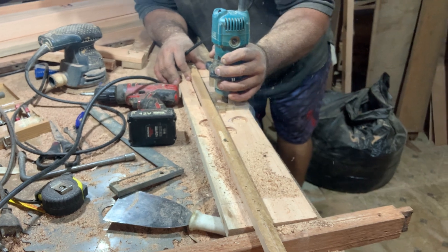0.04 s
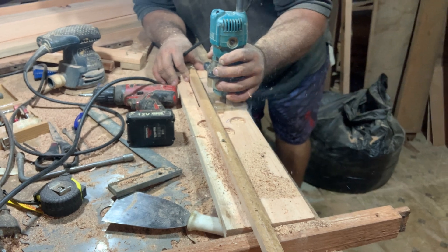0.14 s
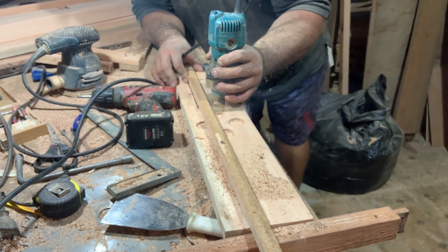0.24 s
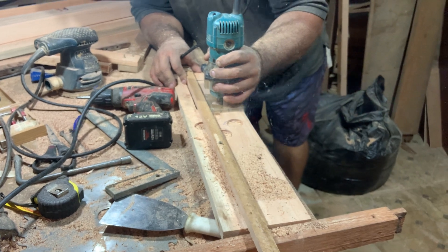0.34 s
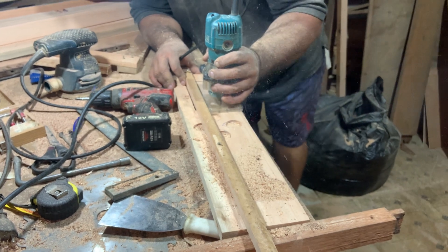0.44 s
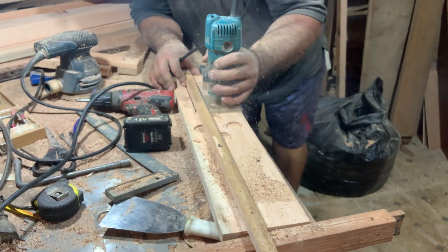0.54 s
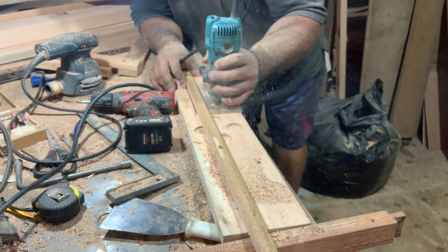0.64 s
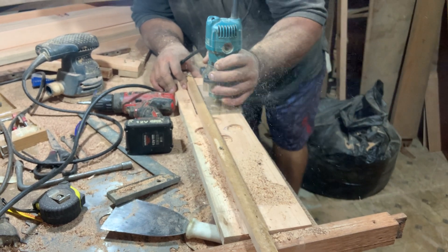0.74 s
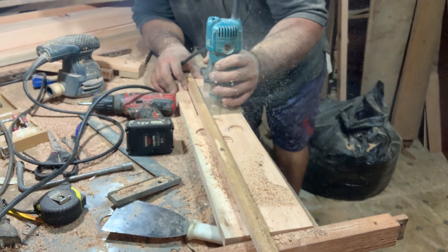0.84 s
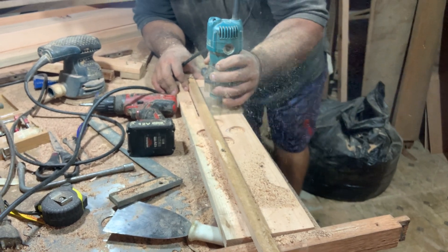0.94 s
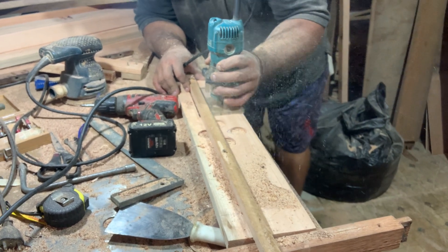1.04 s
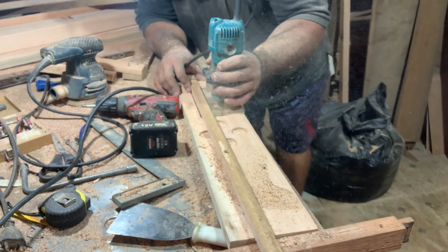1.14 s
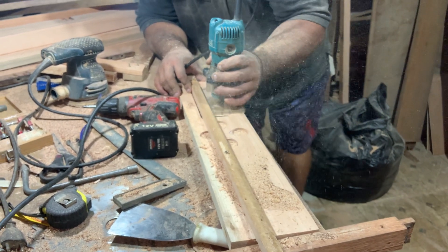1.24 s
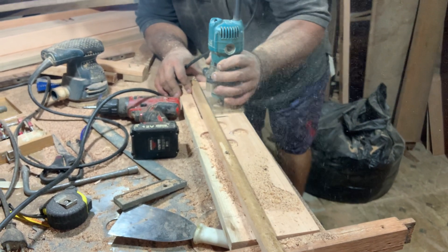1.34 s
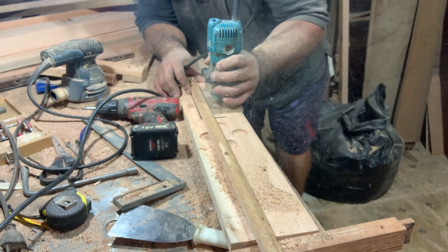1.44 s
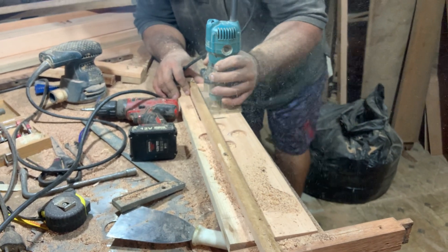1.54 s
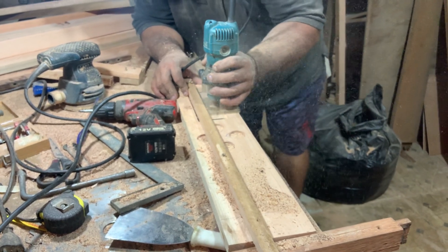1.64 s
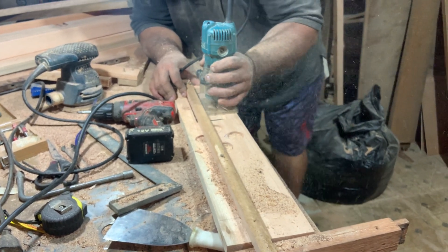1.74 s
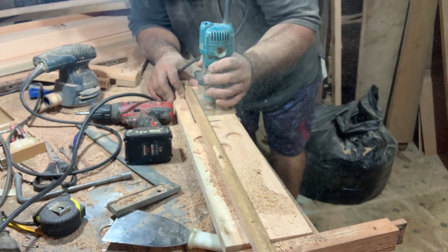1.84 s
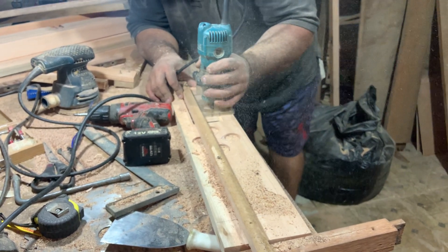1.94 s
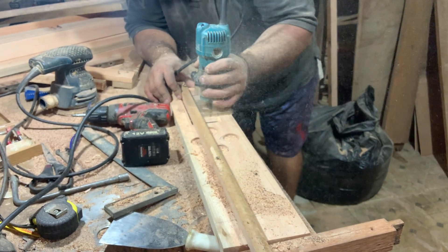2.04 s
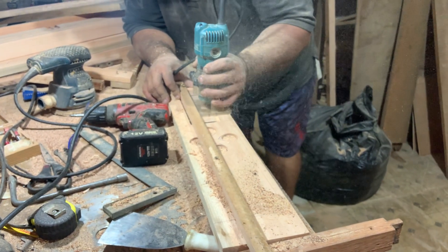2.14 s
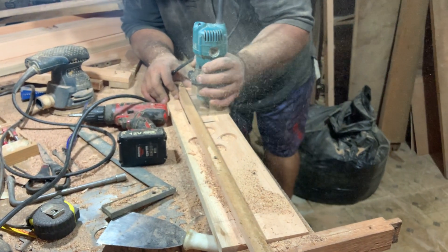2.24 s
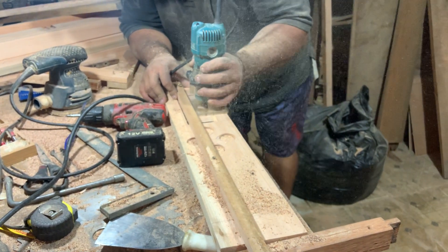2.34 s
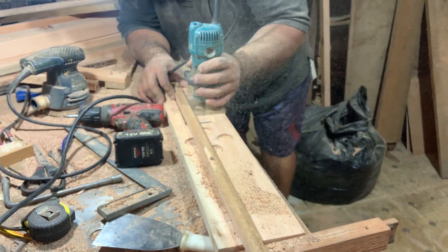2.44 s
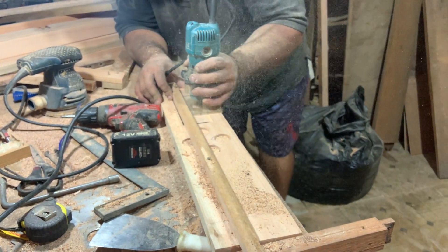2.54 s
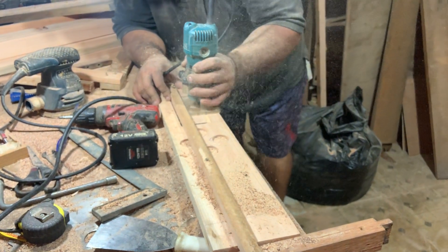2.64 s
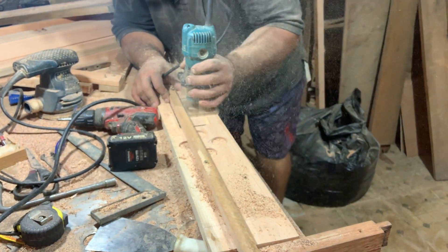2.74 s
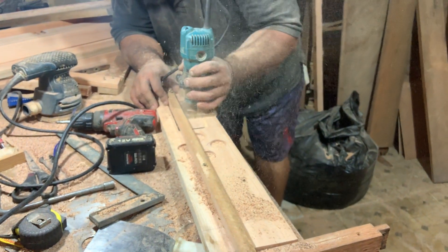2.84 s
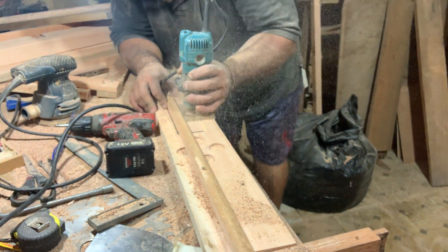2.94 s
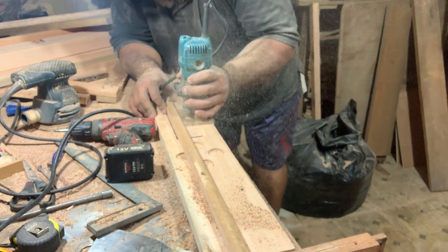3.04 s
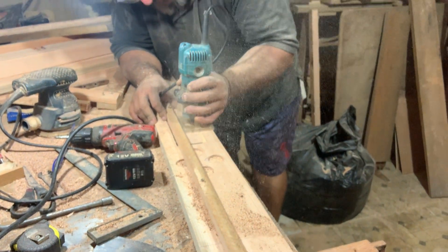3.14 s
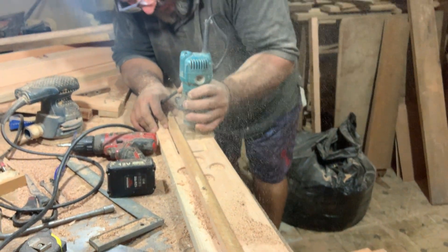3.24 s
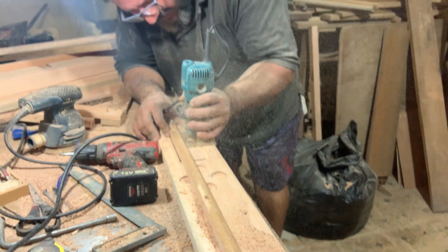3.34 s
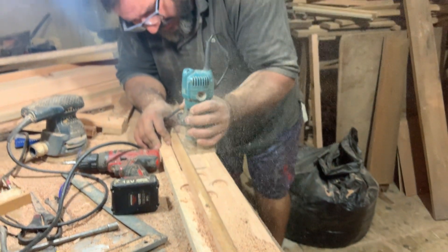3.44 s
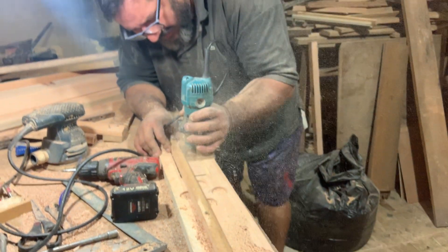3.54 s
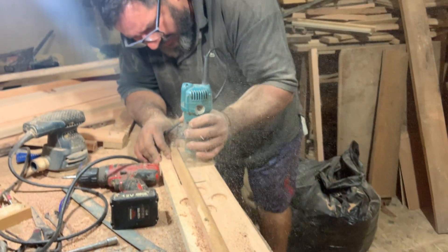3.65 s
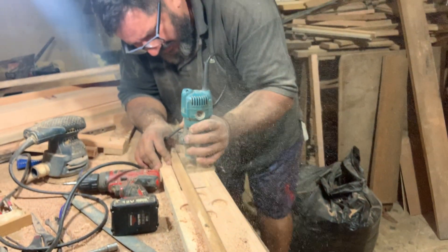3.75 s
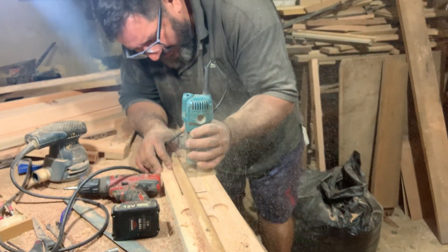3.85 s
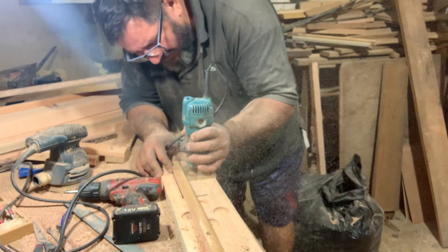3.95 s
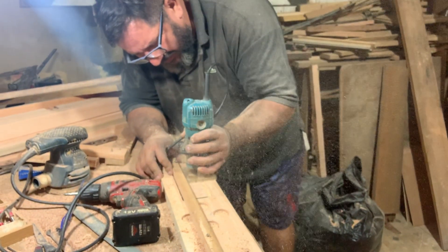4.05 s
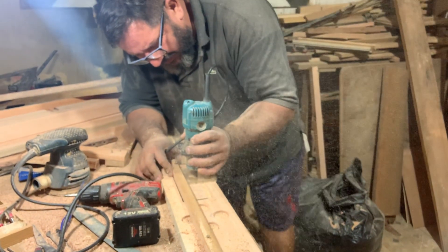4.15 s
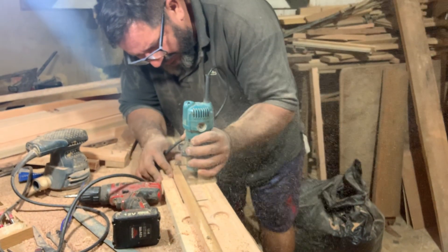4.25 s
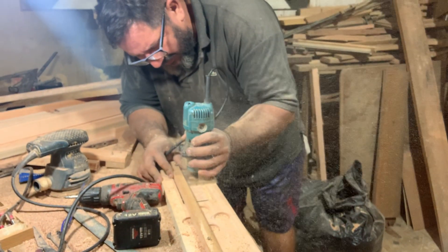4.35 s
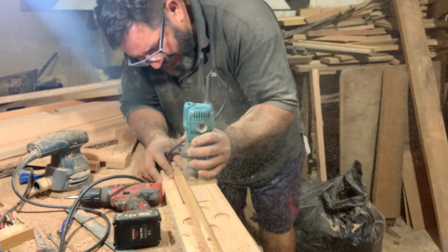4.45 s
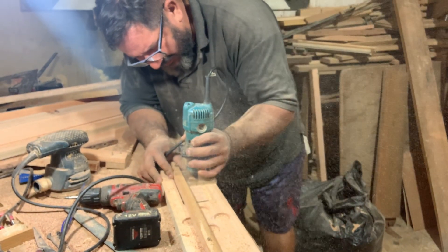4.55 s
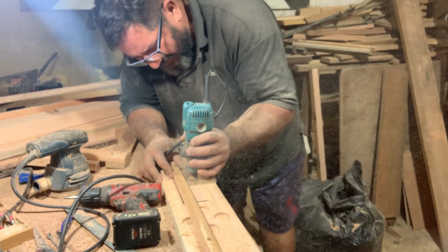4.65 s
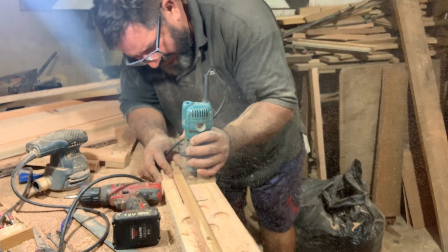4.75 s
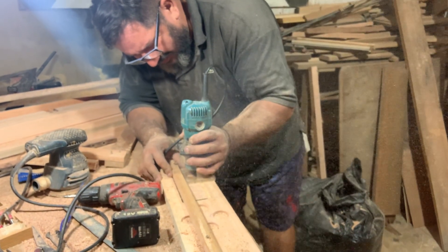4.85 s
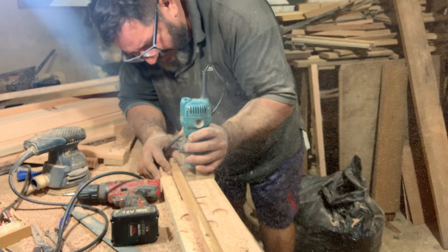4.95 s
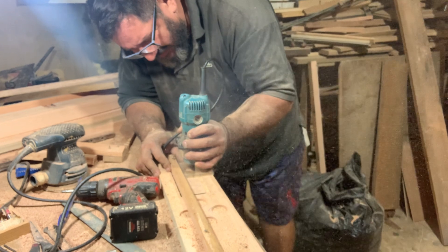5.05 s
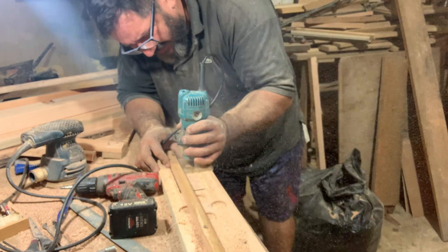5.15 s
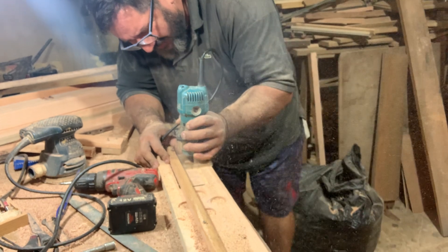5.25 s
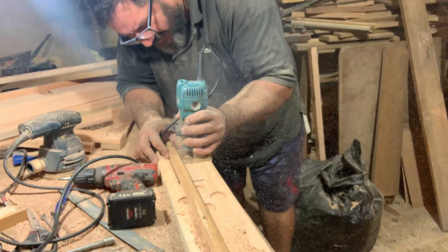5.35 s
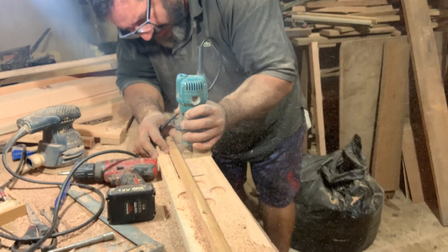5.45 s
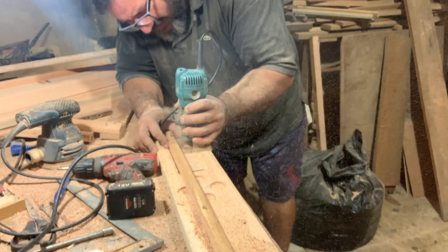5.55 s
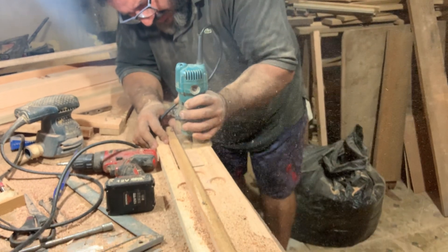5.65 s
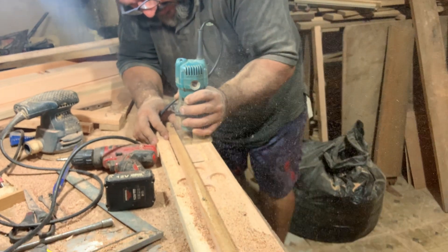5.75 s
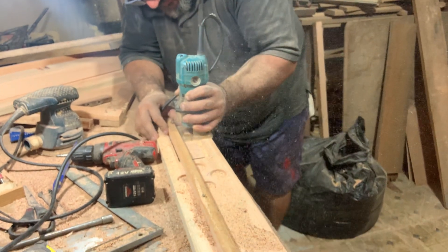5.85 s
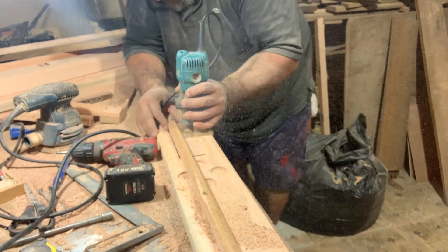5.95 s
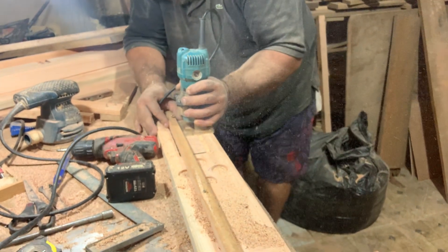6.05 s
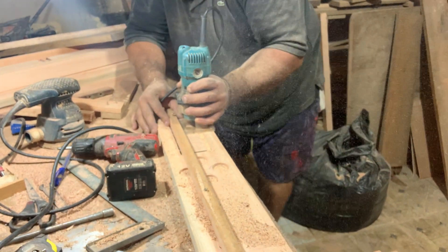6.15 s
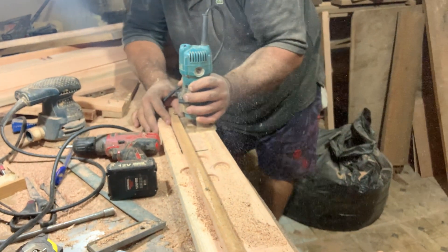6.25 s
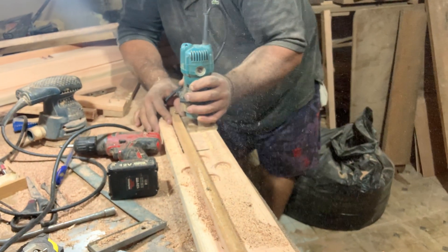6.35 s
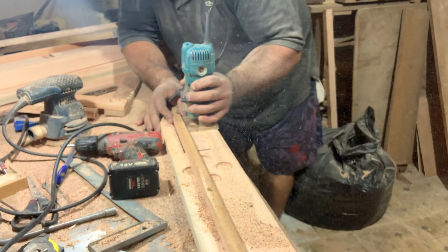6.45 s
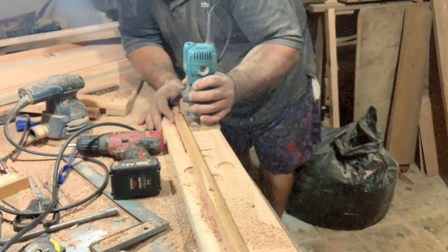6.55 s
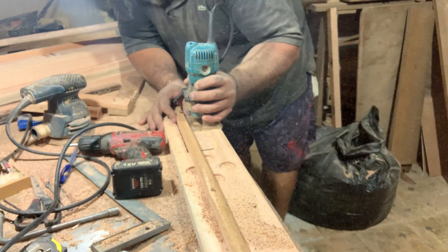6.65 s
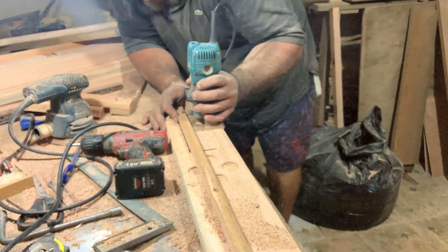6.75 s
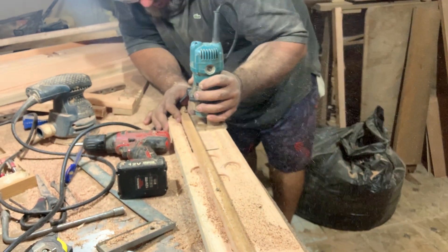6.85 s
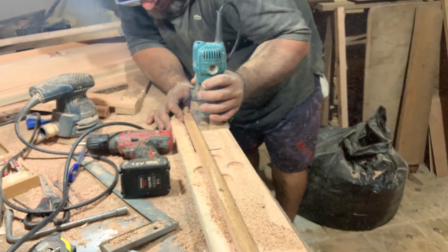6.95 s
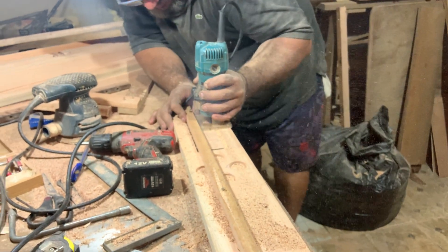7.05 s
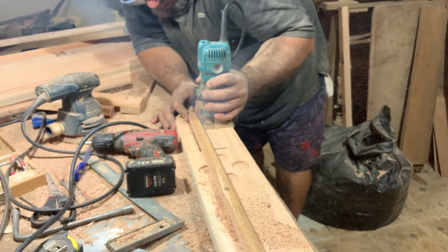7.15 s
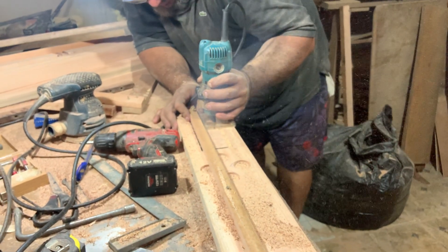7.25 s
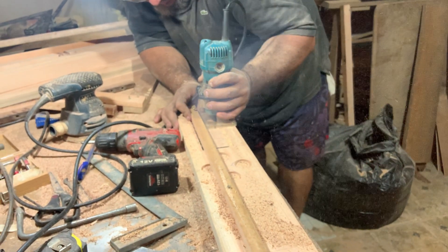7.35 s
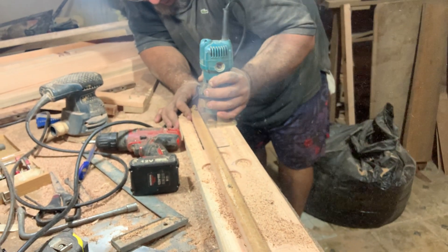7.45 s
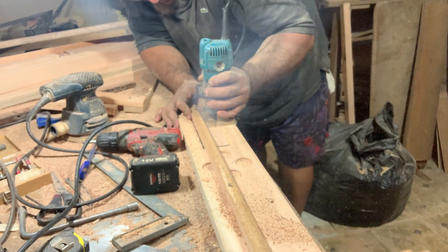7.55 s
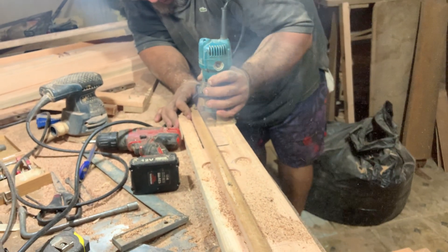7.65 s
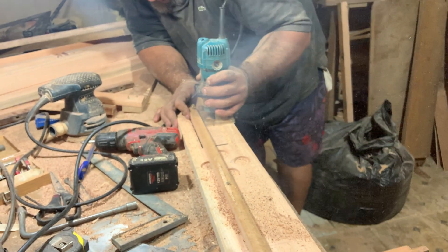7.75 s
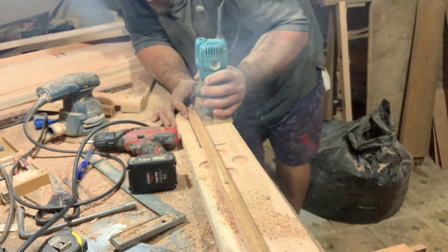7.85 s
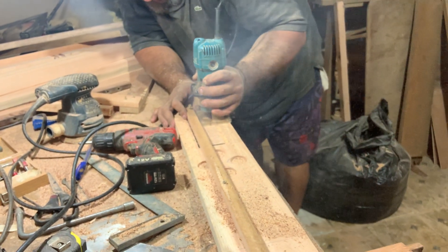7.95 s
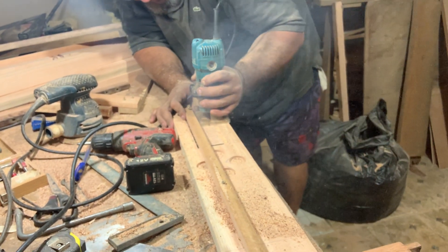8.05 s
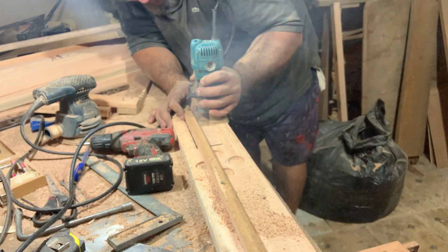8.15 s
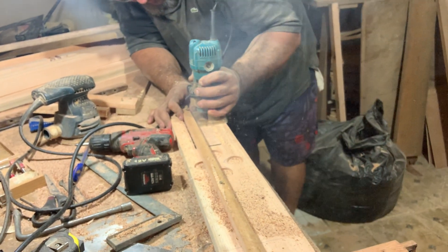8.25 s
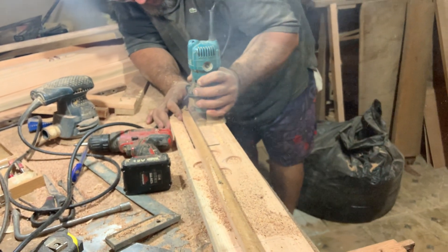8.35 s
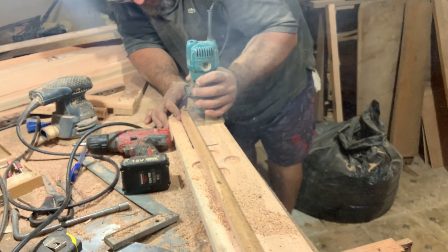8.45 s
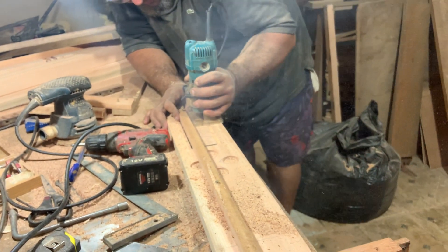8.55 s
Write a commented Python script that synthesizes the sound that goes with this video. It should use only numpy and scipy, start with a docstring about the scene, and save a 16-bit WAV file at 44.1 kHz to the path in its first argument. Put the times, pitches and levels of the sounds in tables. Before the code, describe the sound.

A handheld router whines loudly as it cuts along a board, its pitch sagging under load, climbing high mid-way, then sinking again amid hissing chips.

```python
"""A handheld router works along a board in a timber workshop; its speed sags under load and recovers.
Shaft and two-flute bit sound as sines at multiples of the turning rate, with side tones from the mains
ripple of the motor. Board noise and the hiss of chips and cooling air are noise pulsed by the flutes;
the steel bit rings through resonances, at its strongest a squeal, and a faint mains hum lies beneath.
Two microphone ports hear it in a small dry room whose walls are feedback delays."""
import sys
import numpy as np
from scipy import signal
from scipy.fft import rfft, irfft, next_fast_len
from scipy.io import wavfile
from scipy.ndimage import uniform_filter1d

SR = 44100
rng = np.random.default_rng(int(sys.argv[2]) if len(sys.argv) > 2 else 0)


def digitize_waveform(pressure):
    """Quantize a signal to 16-bit integers and store it at the path in sys.argv[1].

    Rows of a 2-D input are taken as channels; values are limited to [-1, 1].
    """
    field = np.atleast_2d(pressure).T
    bounded = np.clip(field, -1, 1)
    quanta = np.round(bounded * 32767).astype(np.int16)
    wavfile.write(sys.argv[1], SR, quanta)


N = 378819  # samples

# Room and ports
# sound returned by the walls: (frequency [Hz], level [dB])
WALL_SPECTRUM = [(40, -27), (100, -26), (250, -23), (500, -11.5), (1200, -14.5), (2500, -13.5), (5500, -13),
                 (6500, -10), (8500, -24), (15000, -21)]
# phase by which the left port leads in the direct sound: (frequency [Hz], lead [rad])
PORT_PHASE = [(0, 0), (1000, .55), (2000, .95), (3400, 1.8), (4300, 1.5), (4900, 2.1), (5500, 1.8),
              (6300, 0), (8600, -3.14), (10400, -5.6), (11000, -6.3), (13450, -9.42), (15300, -12.5)]
# direct sound, left minus right: (frequency [Hz], level [dB])
PORT_BALANCE = [(60, -0.5), (500, -3.5), (1500, -2), (2100, 0.5), (2800, -4.5), (4300, -5), (5400, -14),
                (6300, -6), (7200, 0), (8500, -4.5)]
# the tool drifts across, left minus right: (time [s], level [dB])
TOOL_TRAVEL = [(0.0, 4), (0.26, 2), (0.5, 2.5), (1.91, 1.5), (2.56, 3), (3.8, 2), (3.99, 3), (4.28, 2.5),
               (4.55, 3.5), (5.05, 0.5), (6.51, 3.5), (6.77, 4), (7.25, 2.5), (7.58, 2.5), (7.92, 2),
               (8.59, 4)]
ROOM_T60_S, CUTOFF_HZ = 0.31, 15600

# Mains hum and torque ripple
RIPPLE_HZ = 120
# hum lines before they waver: (frequency [Hz], rms level [dB])
HUM_LINES = [(120, -67), (240, -59)]
# wavering of the hum: (time [s], change [dB])
HUM_CHANGE = [(0, -9), (1.5, -4), (2, -8), (3.1, 2), (4.1, -5), (4.7, -4), (5.9, 0), (6.4, -10), (7.4, -6),
              (7.8, -2.5), (8.59, -7)]

# Speed and cut
# spindle speed before inertia rounds it off: (time [s], turning rate [Hz])
SPINDLE_SPEED = [(0.0, 391.6), (0.04, 381.8), (0.57, 315.4), (0.74, 303.3), (0.88, 302.3), (1.17, 305),
                 (1.38, 292.9), (1.43, 293.7), (1.55, 305.8), (1.63, 312.9), (1.82, 317.4), (2.01, 335.5),
                 (2.32, 339.7), (2.46, 335.2), (2.56, 322.9), (2.87, 304.4), (3.18, 316.4), (3.37, 308.6),
                 (3.49, 293.1), (3.54, 291.9), (3.76, 322), (3.85, 333.8), (3.97, 337.2), (4.16, 331.5),
                 (4.35, 362.7), (4.47, 366.7), (4.81, 357.6), (4.98, 350.3), (5.17, 344.6), (5.65, 342.2),
                 (6.0, 392.4), (6.17, 415.4), (6.44, 439), (6.6, 452.5), (6.84, 463.3), (6.94, 457.4),
                 (7.61, 401.4), (7.85, 378.5), (7.99, 368.8), (8.08, 366.5), (8.47, 361), (8.59, 358.7)]
INERTIA_S = .04  # the rotor rounds off each change of speed
# base levels: (time [s], bite of two flutes [dB], once-a-turn shake [dB], chip hiss [dB])
CUT_LEVELS = [(0.0, -30.5, -34.5, -30), (0.08, -29, -36, -35), (0.24, -27, -46.5, -32.5),
              (0.48, -35.5, -43.5, -42), (0.64, -36, -45.5, -33.5), (0.74, -34.5, -40.5, -38),
              (1.28, -31.5, -38, -34.5), (1.5, -37.5, -40.5, -37.5), (1.76, -35, -43, -39.5),
              (1.89, -35, -48, -41), (2.16, -30.5, -44, -39.5), (2.4, -30, -43, -38.5),
              (2.48, -27, -40.5, -33.5), (2.56, -33.5, -40.5, -35), (2.72, -26, -42.5, -34.5),
              (2.82, -32, -40, -36.5), (2.96, -24.5, -42.5, -36), (3.2, -26, -40, -35),
              (3.52, -26.5, -35.5, -35.5), (3.66, -37, -49, -36.5), (3.8, -36.5, -49, -42.5),
              (4.0, -26.5, -35.5, -40), (4.2, -33, -42.5, -39), (4.5, -32, -44.5, -41.5),
              (4.88, -29, -46, -38.5), (5.3, -34.5, -44.5, -40), (5.66, -32, -46.5, -39.5),
              (5.8, -36, -40, -43), (6.16, -45.5, -46, -40.5), (6.7, -41, -43, -34),
              (6.96, -33.5, -41, -32.5), (7.36, -28.5, -40, -37), (7.44, -29.5, -41, -36),
              (7.9, -29, -45.5, -42), (8.4, -33.5, -48.5, -39.5), (8.59, -29.5, -46.5, -39)]
# reference from which layers follow the cut: (bite [dB], shake [dB], chips [dB])
REFERENCE_CUT = [-31, -42, -38]
# layers that follow the cut: (mean level [dB], shares of the swing of bite, shake, chips [dB/dB])
BOARD_FOLLOW, RING_FOLLOW = (-44, 0.2, 0.4, -0.18), (-39, -0.02, 0.5, 0.5)

# Noise and ring
# relative spectrum of the chip hiss: (frequency [Hz], density [dB per Hz])
CHIP_SPECTRUM = [(1500, -9.5), (2500, 8), (3200, 6.5), (4200, 6.5), (5600, 3), (6500, 9), (7500, 8.5),
                 (8300, -3.5), (9500, 11), (12000, -53)]
# chip hiss above AIRY_HZ: (time [s], change [dB])
CHIP_BRIGHTNESS = [(0, -3), (1, -10), (2, -2.5), (2.6, -7), (3.2, -12), (3.8, -2.5), (4.2, 0.5), (5, -2),
                   (5.7, -1.5), (6.2, -5), (6.8, -8.5), (7.3, 1), (7.9, 2), (8.59, -2)]
AIRY_HZ = 3600
# relative spectrum of the board noise: (frequency [Hz], density [dB per Hz])
BOARD_SPECTRUM = [(25, -33), (45, -17), (60, -8.5), (115, -11), (180, -23), (250, -16), (340, -5.5),
                  (530, -14), (640, -11), (760, -13), (950, 3.5), (1200, -0.5), (1600, 2), (2100, 2.5),
                  (3200, -15), (4200, -10), (7000, -80)]
# ends of the board noise: (time [s], rumble under RUMBLE_HZ [dB], rasp above RASP_HZ [dB])
RUMBLE_AND_RASP = [(0, -6, -1), (.9, -13, 2), (1.35, -3, 3), (1.7, -1, 0), (2.3, 0, 0), (2.7, 4, 3.5),
                   (3.5, 1, 6.5), (4, 3, -4), (4.5, -4, -4), (5.3, 6, -11), (5.7, 0, -1), (6.3, 1, 4.5),
                   (6.9, 1, -6.5), (7.5, -2, -3), (8, 5, 1), (8.59, 3, -4)]
# board noise between RUMBLE_HZ and DRONE_HZ: (time [s], change [dB])
DRONE_LEVEL = [(0, 1), (.8, -6), (1.6, -8), (2.2, 4), (2.7, -6), (3.5, 0), (4.1, -9), (4.6, -2.5), (5.3, 1),
               (5.8, 2), (6.4, 10), (6.9, -8), (7.5, 3), (8, -6), (8.59, -3)]
RUMBLE_HZ, DRONE_HZ, RASP_HZ = 170, 750, 1250
# board noise swells or sinks: (time [s], length [s], change [dB])
BOARD_CHANGES = [(.0, 0.25, -1), (.85, 0.26, -2), (1.25, 0.17, 1.5), (2.48, 0.19, 5), (2.6, 0.32, 1.5),
                 (3.34, 0.24, 0), (4.2, 0.21, 3.5), (5, 0.843, 0), (6.4, 0.45, 4), (6.8, 0.43, 7),
                 (7.25, 0.31, 3.5)]
# modes of the steel bit: (frequency [Hz], width [Hz], relative gain [dB])
BIT_MODES = [(8350, 150, -3), (8800, 200, -5), (9940, 140, 2), (11300, 400, -5), (11960, 90, 3),
             (12800, 110, 0), (13430, 110, 0), (14450, 80, 3)]
# the bit's ring rises, at its strongest a squeal, or sinks: (time [s], length [s], change [dB])
RING_CHANGES = [(0, 0.1, 2), (.55, 0.84, 2), (2.05, 0.43, 11), (2.901, 0.39, 2.5), (3.459, 0.11, 5),
                (3.892, 0.31, 8), (4.4, 0.17, -3), (4.7, .14, -1), (5.202, 0.49, 3.5), (6.8, 0.56, -0.5),
                (8.3, 0.14, 4)]
RING_EDGE_S, BOARD_EDGE_S = 0.082, 0.14
RING_TO_BOARD = 0.16  # share of each ring change by which the board noise moves the other way
COLLET_HZ, COLLET_WIDTH_HZ, COLLET_DB = 12000, 180, -1  # level relative to the high whine

# Tones of the shaft and bit
# base levels of the finer lines: (time [s], side tones [dB], high whine [dB])
FINE_LEVELS = [(0, -48, -39), (.2, -44.5, -39), (.48, -61.5, -44.5), (.98, -49.5, -46.5),
               (1.4, -55.5, -50.5), (1.72, -50.5, -46), (1.98, -52.5, -47), (2.32, -53, -42.5),
               (2.6, -53, -47), (3.1, -48.5, -45), (3.4, -50, -46), (3.7, -54.5, -50), (4.1, -45.5, -40),
               (4.3, -54.5, -46), (4.5, -49.5, -42.5), (5.2, -46.5, -45.5), (5.62, -47, -46.5),
               (5.85, -58.5, -47.5), (6.22, -52, -58), (6.79, -52, -56), (6.86, -49, -38.5),
               (7.44, -49.5, -42.5), (7.94, -51, -42.5), (8.59, -51, -42)]
# high multiples of the turning rate: (multiple)
WHINE_MULTIPLES = [9, 11, *range(13, 37)]
# housing response to the high whine: (frequency [Hz], level [dB])
WHINE_RESPONSE = [(2700, 3), (3500, 0), (4200, 2.5), (4800, -7), (5300, -12.5), (6000, -6.5), (6450, 2),
                  (6900, -17), (7400, -17.5), (8000, -7), (8600, -57), (9500, -7.5), (12000, -7.5),
                  (14000, -25)]
# side tones: (multiple, two ripples below [dB], one below [dB], one above [dB], two above [dB])
SIDE_LEVELS = [(1, -3.5, -1.7, 0.5, -2.5), (2, -3.5, 0.58, -0.5, -4), (3, 0, 0.2, -6, -1),
               (4, -9, -1.8, -1.5, -3), (5, -10, -1.4, -1, -3), (6, -8, -1.5, 1, 4), (7, -21, -1.1, 9, -8),
               (8, -6, -1.5, -8, -3)]
# housing response to the side tones: (frequency [Hz], level [dB])
SIDE_RESPONSE = [(100, -29.5), (230, -6.5), (330, -5), (400, 3), (450, -3.5), (500, -11), (570, -15),
                 (700, -12.5), (830, -9), (950, -4), (1150, -12), (1550, 1.5), (2100, -1.5), (3000, -36),
                 (4500, -20)]
# side tones swell or fade: (time [s], length [s], multiple, ripples above, change [dB])
SIDE_TONE_SWELLS = [(0, .5, 1, 1, -14), (.6, 0.64, 1, 1, 2), (.7, 0.48, 3, 1, 8), (1.0, 0.24, 2, 1, 10),
                    (1.0, 0.21, 1, -1, 5), (1.899, 0.56, 2, 1, 12.5), (2.1, 0.65, 4, 1, 11),
                    (2.7, 0.41, 1, 1, 5), (3.604, 0.25, 1, 1, 6), (3.88, .3, 1, 1, 3),
                    (3.7, .6, 2, -2, -19), (3.801, 0.43, 2, -1, -18), (4.3, 1.9, 3, -1, 2.5),
                    (4.3, 0.5, 1, 1, -6.5), (4.5, 1.2, 2, 2, 1), (5.1, 0.79, 2, 1, 5),
                    (5.801, 0.89, 1, -1, 7), (5.904, 0.56, 1, 1, 7), (5.899, 0.89, 1, 2, 8.5),
                    (6.4, 0.65, 1, 1, -17), (5.902, 0.87, 4, 1, -17), (6.301, 0.59, 2, -1, 9),
                    (6.75, 0.48, 1, -1, -3), (7.5, 1.2, 1, -1, -6.5), (7.202, 0.48, 1, 1, 8.5),
                    (7.7, 1, 2, -1, 10.5), (7.699, 1, 4, 1, 7), (7.903, 0.77, 2, 2, 12),
                    (8, 0.59, 1, 1, -26), (8.001, 0.648, 2, -2, -24)]
# low multiples; even ones follow the bite, odd ones the shake: (multiple, level [dB])
LOW_MULTIPLES = [(1, 0), (2, -5.5), (3, 4), (4, 3.5), (5, -1), (6, -1.0), (7, 5), (8, -2.5), (10, -5.5),
                 (12, -9.5)]
# board and housing favour some pitches: (frequency [Hz], level [dB])
BOARD_RESPONSE = [(280, -6.5), (330, 3.5), (400, 3.5), (580, 1.5), (640, 9), (720, -2), (850, -7.5),
                  (960, 4), (1100, -5.5), (1260, -6), (1400, 0), (1660, 10.5), (1780, -3), (1900, -1),
                  (2110, 2.5), (2370, -7), (2820, -5), (3540, -3), (3970, -1.5), (4210, -4.5), (4500, -1),
                  (5600, -4)]
# single multiples swell or fade: (time [s], length [s], multiple, change [dB])
TONE_SWELLS = [(0, 0.14, 1, -14.5), (0, 0.21, 16, 11), (.1, 0.43, 13, -12), (0.093, 0.16, 11, -12),
               (0.301, .4, 7, -2), (0.082, 0.16, 2, 8.5), (0.07, 0.13, 12, -24), (0.063, 0.49, 6, 11.0),
               (0.24, 0.091, 8, -12), (0.439, 0.24, 3, 3), (0.551, 0.11, 2, 7.5), (.6, 0.16, 4, 4.5),
               (0.706, .3, 5, -10), (.9, 1, 3, -0.5), (0.908, 0.08, 4, -7), (0.92, 0.34, 5, -14),
               (1.01, 0.2, 4, -6), (1.04, 0.35, 2, -6.5), (1.1, 0.22, 4, 3.5), (1.11, 0.59, 9, 9.5),
               (1.269, 0.2, 5, 4), (1.3, 0.49, 6, 4.5), (1.452, 0.051, 2, -14), (1.496, 0.11, 5, -11),
               (1.56, 0.075, 1, -9), (1.621, 0.22, 2, 5.5), (1.87, 0.039, 2, -9), (1.562, 0.16, 4, -7),
               (1.804, 0.11, 4, 2), (1.9, .6, 16, 4), (2.05, 0.073, 1, 0), (2.302, 0.11, 9, -12),
               (1.721, 0.3, 6, -9), (1.954, 1.23, 10, -14), (2.0, 1.09, 4, -5.5), (2.08, 0.6, 7, -14),
               (2.411, 0.58, 2, -4.5), (2.435, 0.88, 12, -10.5), (2.4, 0.63, 6, 5.5), (2.5, 0.49, 9, 6.5),
               (2.5, 0.45, 10, 9), (2.5, 0.33, 12, 3), (2.796, 0.098, 1, -11), (2.504, 0.061, 2, 1),
               (2.755, 0.13, 6, -3.5), (3.095, 0.12, 6, -9), (2.8, 0.85, 16, 9.5), (3.1, 0.98, 20, -6),
               (3.1, .3, 5, -3.5), (3.599, 0.51, 4, 0.5), (3.798, 0.27, 7, 11), (2.798, 0.65, 2, -13),
               (2.92, 1.07, 10, -6.5), (2.92, 1.36, 7, -9), (3.035, 0.32, 3, -10), (3.57, 0.33, 6, -8),
               (3.841, 0.33, 5, -12), (3.883, 0.33, 1, -14), (3.926, 0.32, 2, -8.5), (4.1, 0.54, 11, -3),
               (4.197, 0.34, 3, -10), (4.239, 1.43, 8, -5.5), (4.4, 0.98, 22, 4), (4.468, 0.065, 2, -10),
               (4.5, 0.77, 14, 2.5), (4.5, 0.38, 18, -0.5), (4.402, 0.79, 12, 5.5), (4.3, 0.53, 10, -1),
               (4.306, 0.42, 6, -3.5), (4.7, 1.29, 20, 13.5), (4.692, 0.11, 3, -19), (4.83, 0.099, 1, -19),
               (5.1, 0.54, 18, 1), (5.4, 0.49, 22, 8), (4.639, 1.29, 6, -5), (4.928, 0.25, 2, -4.5),
               (5.039, 0.66, 5, -12), (5.16, 0.46, 4, -3.5), (5.103, 0.29, 2, 4), (5.2, 0.44, 12, 12),
               (5.28, 0.2, 10, 6.5), (5.402, 0.44, 3, -5), (5.624, 0.32, 4, 1.5), (5.84, 0.93, 7, -7),
               (5.7, 0.68, 12, -7), (6.17, 0.12, 1, -10), (5.902, .6, 2, 9), (6.291, 0.24, 1, -7.5),
               (6.3, 0.54, 10, -17), (6.3, 0.75, 9, 9), (6.5, 0.79, 16, 1), (6.701, 0.59, 17, 15),
               (6.8, 0.47, 14, -6), (7.3, 0.28, 11, -12), (7.399, 0.33, 17, 14), (7.501, 0.61, 18, 11.5),
               (7.501, 0.32, 19, 6), (7.636, 0.056, 1, -8), (7.351, 0.04, 4, -1), (7.802, 0.068, 4, -2.5),
               (7.1, 0.53, 10, 1), (7.7, 0.63, 20, 11), (7.9, 0.78, 22, 4.5), (7.9, 0.79, 17, -11),
               (6.759, 0.18, 8, 6.5), (7.24, 1.13, 12, -17), (7.376, 0.058, 4, 3), (7.593, 0.079, 1, -2),
               (7.721, 0.062, 4, 5), (7.722, 0.2, 3, 11.5), (7.882, 0.86, 1, 7), (7.954, 0.7, 6, 4),
               (7.896, 0.8, 2, 1), (7.94, 0.37, 4, 2.5), (8.196, 0.17, 8, -8), (8.2, 0.26, 10, 9.5),
               (8.452, 0.28, 4, -8.5), (0.118, 0.068, 1, 0), (2.349, .2, 8, 4), (2.948, 0.41, 6, 3.5),
               (4.25, .1, 1, 3), (4.416, 0.11, 4, -2.5), (4.958, 0.037, 4, -7), (5.004, .15, 1, 7),
               (5.005, 0.11, 4, 4.5), (5.65, 0.21, 8, 5.5), (5.655, 0.14, 4, 4), (5.94, 0.042, 4, 6),
               (6.821, 0.18, 9, -3), (7.149, 0.16, 3, 9), (7.529, .04, 4, -1), (7.64, .06, 4, -5),
               (7.848, 0.036, 4, 0.5), (7.975, 0.035, 4, -1.5), (8.349, 0.14, 12, 3),
               (8.504, 0.094, 6, -21), (4.3, 0.27, 3, 7), (1.05, 0.11, 3, -3), (2.952, 0.057, 6, -9.5),
               (3.27, 0.083, 2, -8), (3.62, 0.057, 2, -11), (5.735, 0.033, 2, -8), (7.13, 0.044, 3, -8),
               (7.149, .4, 5, 2.5), (7.615, 0.055, 2, -13), (7.781, 0.035, 1, -10), (0.417, 0.066, 6, -2.5),
               (4.56, 0.075, 4, 2), (5.0, .45, 3, 2.5), (6.198, 0.27, 4, 1), (7.171, 0.41, 6, 4)]
SWELL_EDGE_S = .045
WANDER_DB, WANDER_HZ = .9, 5  # each low tone swells and fades on its own
FLUTTER, GLIDE_FLUTTER = .08, .2  # depth at steady speed, most that a glide adds
FULL_GLIDE_HZ_PER_S, FLUTTER_HZ = 70, 14


def from_db(db):
    """Logarithmic level: decibels to amplitude ratio."""
    return 10 ** (np.asarray(db) / 20)


def rms_one(x):
    """Normalisation of power: scale to rms 1."""
    return x / np.sqrt(np.mean(x ** 2) + 1e-20)


def in_time(rows):
    """Linear interpolation in time: each column of a table, one value per sample."""
    s, *columns = np.transpose(rows)
    return [np.interp(np.arange(N) / SR, s, column) for column in columns]


def at_hz(points, hz):
    """Logarithmic pitch: a spectrum is interpolated on a log-frequency axis."""
    at, value = np.transpose(points)
    return np.interp(np.log(hz + 1), np.log(at + 1), value)


def held(s, length, edge_s):
    """Trapezoidal envelope: rises from 0 towards 1, holds and falls again."""
    t = np.arange(N) / SR
    nearest_end = np.minimum(t - s, s + length - t)
    return np.clip(nearest_end / edge_s + .5, 0, 1)


def summed_changes(events, edge_s):
    """Multiplication of gains: the changes in dB of a table of events are added."""
    return sum(db * held(s, length, edge_s) for s, length, db in events)


def drift(rate):
    """Low-passed random process: noise through a double one-pole filter, rms 1."""
    step = 40  # samples between the points of the slow noise
    r = np.exp(-2 * np.pi * rate * step / SR)
    noise = rng.standard_normal(N // step + 2002)
    slow = signal.lfilter([1], [1, -2 * r, r * r], noise)[2000:]  # drop the start-up
    return np.interp(np.arange(N) / step, np.arange(len(slow)), rms_one(slow))


def coloured(x, spectrum):
    """Spectral shaping: a noise is weighted in frequency, then set to rms 1."""
    hz = np.arange(N // 2 + 1) * SR / N
    return rms_one(irfft(rfft(x) * from_db(at_hz(spectrum, hz)), N))


def split(x, hz):
    """Crossover: second-order filters give the parts below and above a frequency."""
    return [signal.sosfilt(signal.butter(2, hz, kind, fs=SR, output="sos"), x)
            for kind in ("low", "high")]


def resonance(x, hz, width_hz):
    """Damped oscillator: a two-pole resonance with gain close to 1 at its peak."""
    r = np.exp(-np.pi * width_hz / SR)
    zeros = (1 - r * r) / 2 * np.array([1, 0, -1])
    poles = [1, -2 * r * np.cos(2 * np.pi * hz / SR), r * r]
    return signal.lfilter(zeros, poles, x)


def follows(layer, cut_db):
    """Proportional response: the level of a layer swings with the cut."""
    mean_db, *shares = layer
    swings = zip(shares, cut_db, REFERENCE_CUT)
    return mean_db + sum(share * (db - mean) for share, db, mean in swings)


def wall_reflections(hz):
    """Recirculating delay: each loop loses 60 dB in the decay time."""
    walls = np.zeros((2, len(hz)), complex)
    for k, lag in enumerate(rng.uniform(.012, .04, 16)):
        turn = from_db(-60 * lag / ROOM_T60_S) * np.exp(-2j * np.pi * hz * lag)
        walls[k % 2] += turn / (1 - turn)
    return walls


def ripple():
    """Torque pulsation: phase of the ripple at twice the mains rate."""
    return 2 * np.pi * RIPPLE_HZ * np.arange(N) / SR


def mains_hum():
    """Harmonics of the torque ripple: steady pitches with a wavering level."""
    out = np.zeros(N)
    for hz, db in HUM_LINES:
        level = from_db(db + in_time(HUM_CHANGE)[0] + 2.0 * drift(1.5))
        out += np.sqrt(2) * level * np.sin(hz / RIPPLE_HZ * ripple())
    return out


def strokes(angle, depth, throb):
    """Amplitude modulation: noise swells at each flute, one biting harder, and with the ripple."""
    bite = 1 + depth * (np.cos(2 * angle) + 0.18 * np.cos(angle))
    return rng.standard_normal(N) * bite * (1 + throb * np.cos(ripple()))


def chips(angle):
    """Pulsed broadband noise: chip hiss whose upper part comes and goes on its own."""
    low, high = split(coloured(strokes(angle, depth=0.22, throb=0.036), CHIP_SPECTRUM), AIRY_HZ)
    # the crossover halves meet in opposite phase, hence the minus
    return low - from_db(in_time(CHIP_BRIGHTNESS)[0]) * high


def board(angle):
    """Band-wise modulation: rumble, drone and rasp of the board noise vary separately."""
    rumble_db, rasp_db = in_time(RUMBLE_AND_RASP)
    drone_db = in_time(DRONE_LEVEL)[0] + 2.2 * drift(11)
    rumble, rest = split(coloured(strokes(angle, depth=0.17, throb=.1), BOARD_SPECTRUM), RUMBLE_HZ)
    drone, rest = split(rest, DRONE_HZ)
    middle, rasp = split(rest, RASP_HZ)
    rasp_db = rasp_db + 2.0 * drift(35)
    return from_db(rumble_db) * rumble - from_db(drone_db) * drone + middle - from_db(rasp_db) * rasp


def collet():
    """Noise-driven resonance: one narrow mode rings faintly."""
    return rms_one(resonance(rng.standard_normal(N), COLLET_HZ, COLLET_WIDTH_HZ))


def bit_ring(angle, ring_db):
    """Modal excitation: bites ring the steel bit above a bright hiss; a light cut hardly wakes it."""
    hiss, bites = [strokes(angle, depth=.2, throb=.04) for _ in range(2)]
    hiss = signal.sosfilt(signal.butter(4, [8000, 15000], "band", fs=SR, output="sos"), hiss)
    modes = np.zeros(N)
    for k, (hz, width_hz, db) in enumerate(BIT_MODES):
        modes += (-1) ** k * from_db(db) * resonance(bites, hz, width_hz)
    waking = from_db(.6 * (ring_db + 33))
    return (rms_one(hiss) + waking * rms_one(modes)) / np.sqrt(1 + waking ** 2)


def flutter(turns):
    """Interference: lines break up as they glide through the standing waves of the room."""
    glide = uniform_filter1d(np.abs(np.gradient(turns)) * SR, size=int(INERTIA_S * SR))
    return FLUTTER + GLIDE_FLUTTER * np.clip(glide / FULL_GLIDE_HZ_PER_S, 0, 1)


def tone(angle, level_db, unrest):
    """Sinusoidal partial: one line of given rms level, fluttering with the given depth."""
    level = from_db(level_db) * (1 + unrest * drift(FLUTTER_HZ)) / np.sqrt(1 + unrest ** 2)
    return np.sqrt(2) * level * np.sin(angle + rng.uniform(0, 2 * np.pi))


def swell(k):
    """Level modulation: change in dB of one multiple over time."""
    return sum(db * held(s, length, SWELL_EDGE_S)
               for s, length, which, db in TONE_SWELLS if round(which) == k)


def side_swell(k, ripples):
    """Level modulation: change in dB of one side tone over time."""
    return sum(db * held(s, length, SWELL_EDGE_S)
               for s, length, which, above, db in SIDE_TONE_SWELLS
               if (round(which), round(above)) == (k, ripples))


def side_tones(turns, angle, side_db):
    """Modulation sidebands: lines one and two ripples above and below the low multiples."""
    out, unrest = np.zeros(N), 2.0 * flutter(turns)  # weak lines break up more
    for k, *steps_db in SIDE_LEVELS:
        k = round(k)
        for ripples, db in zip((-2, -1, 1, 2), steps_db):
            housing_db = at_hz(SIDE_RESPONSE, k * turns + ripples * RIPPLE_HZ)
            level_db = side_db + db + side_swell(k, ripples) + housing_db + 2.0 * drift(4)
            out += tone(k * angle + ripples * ripple(), level_db, unrest)
    return out


def high_whine(turns, angle, whine_db):
    """Harmonic series: high multiples of the turning rate, coloured by the housing."""
    out, unrest = np.zeros(N), 2.0 * flutter(turns)  # weak lines break up more
    for k in WHINE_MULTIPLES:
        odd_db = -4.5 * (k % 2)  # two flutes favour the even multiples
        level_db = whine_db + odd_db + at_hz(WHINE_RESPONSE, k * turns) + swell(k)
        out += tone(k * angle, level_db + 2.3 * drift(3.5), unrest)
    return out


def low_tones(turns, angle, bite_db, shake_db):
    """Harmonics through fixed resonances: board and housing colour low multiples as they glide."""
    out, unrest = np.zeros(N), flutter(turns)
    for k, db in LOW_MULTIPLES:
        k = round(k)
        drive_db = shake_db if k % 2 else bite_db
        level_db = db + drive_db + at_hz(BOARD_RESPONSE, k * turns) + swell(k)
        out += tone(k * angle, level_db + WANDER_DB * drift(WANDER_HZ), unrest)
    return out


def router():
    """Superposition: tones, noises, ring and hum are added into one signal."""
    turns = uniform_filter1d(in_time(SPINDLE_SPEED)[0], size=int(INERTIA_S * SR), mode="nearest")
    angle = 2 * np.pi * np.cumsum(turns) / SR
    bite_db, shake_db, chip_db = cut_db = in_time(CUT_LEVELS)
    side_db, whine_db = in_time(FINE_LEVELS)
    ring_change_db = summed_changes(RING_CHANGES, RING_EDGE_S)
    ring_db = follows(RING_FOLLOW, cut_db) + ring_change_db
    board_change_db = summed_changes(BOARD_CHANGES, BOARD_EDGE_S) - RING_TO_BOARD * ring_change_db
    board_db = follows(BOARD_FOLLOW, cut_db) + board_change_db
    out = mains_hum()
    out += from_db(chip_db + 1.4 * drift(17)) * chips(angle)
    out += from_db(board_db + 1.8 * drift(10)) * board(angle)
    out += from_db(whine_db + COLLET_DB) * collet()
    out += from_db(ring_db + 1.4 * drift(27)) * bit_ring(angle, ring_db)
    out += side_tones(turns, angle, side_db)
    out += high_whine(turns, angle, whine_db)
    out += low_tones(turns, angle, bite_db, shake_db)
    return out


def scene():
    """Direct and reflected fields: the ports differ in phase and level; side walls return the sound."""
    size = next_fast_len(N + SR)
    hz = np.arange(size // 2 + 1) * SR / size
    side = np.array([[.5], [-.5]])  # left, right
    phase = np.exp(1j * side * np.interp(hz, *np.transpose(PORT_PHASE)))
    direct = phase * from_db(side * at_hz(PORT_BALANCE, hz))
    walls = wall_reflections(hz)
    sideways = 2 * side * walls[0] + 0.5 * walls[1]  # mostly in opposite sense at the two ports
    wet = from_db(at_hz(WALL_SPECTRUM, hz))
    out = irfft(rfft(router(), size) * (direct + wet * sideways), size)[:, :N]
    return out * from_db(side * in_time(TOOL_TRAVEL)[0])


def record(dry):
    """Band limitation: the microphones lose the deep bass; the top is cut steeply."""
    dry = signal.sosfilt(signal.butter(2, 45, "high", fs=SR, output="sos"), dry)
    return signal.sosfilt(signal.ellip(12, .5, 70, CUTOFF_HZ, fs=SR, output="sos"), dry)


dry = scene()
out = record(dry)
digitize_waveform(out)
```